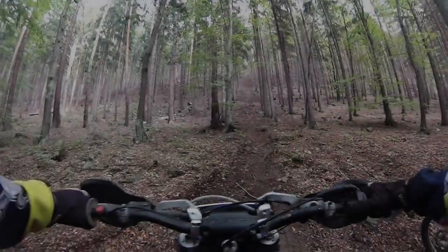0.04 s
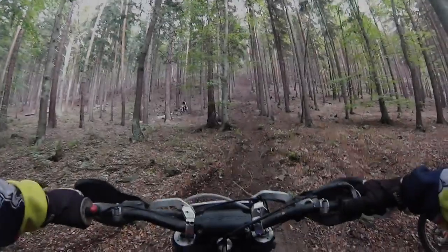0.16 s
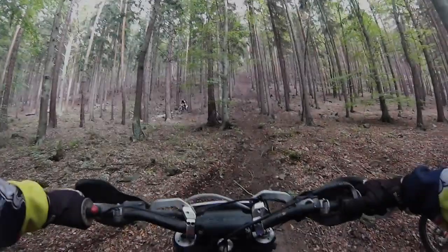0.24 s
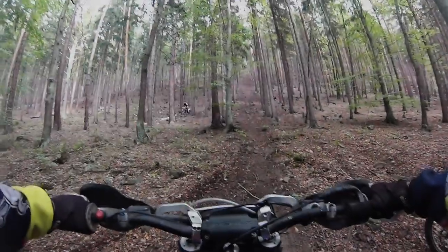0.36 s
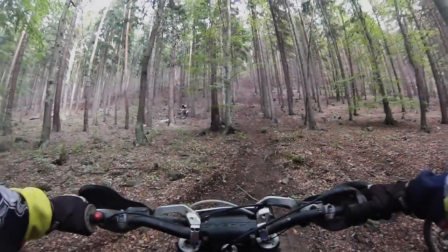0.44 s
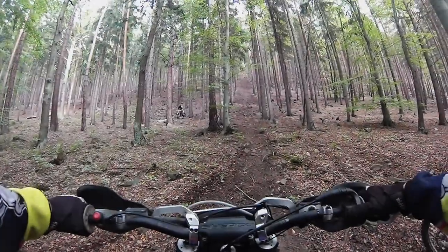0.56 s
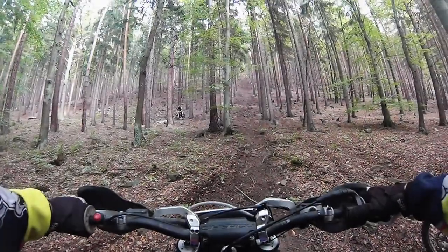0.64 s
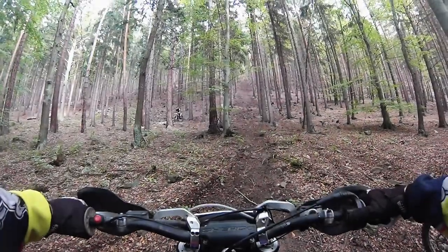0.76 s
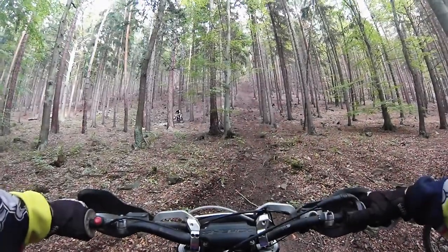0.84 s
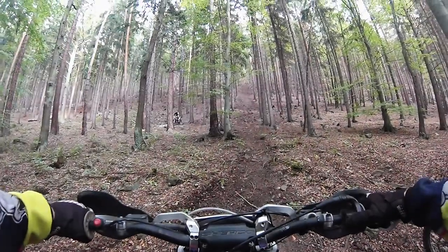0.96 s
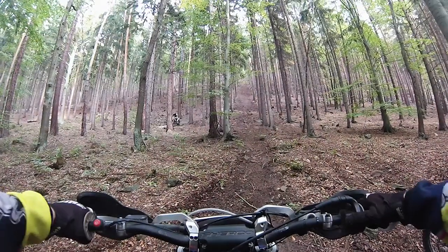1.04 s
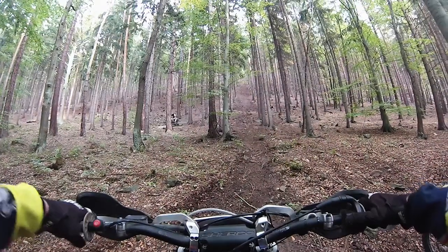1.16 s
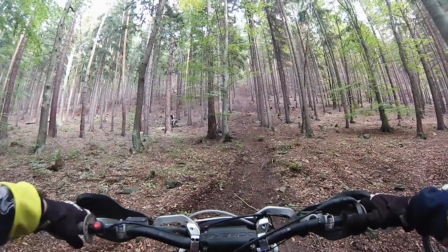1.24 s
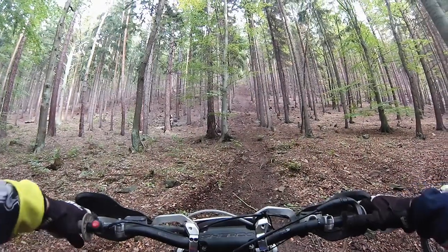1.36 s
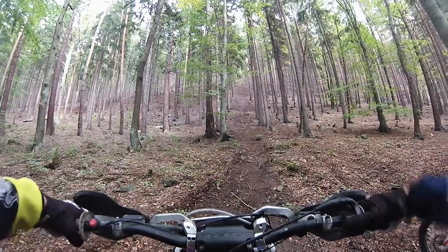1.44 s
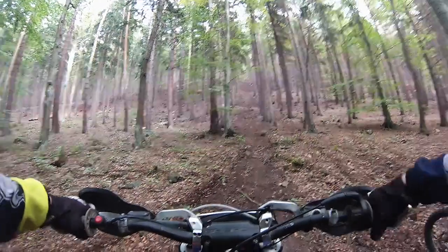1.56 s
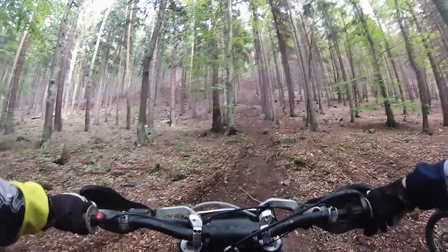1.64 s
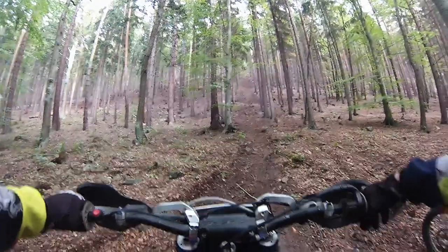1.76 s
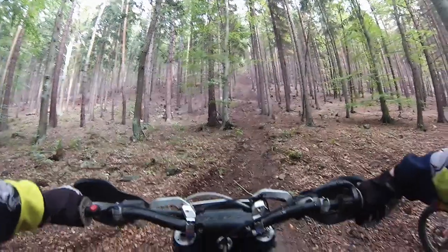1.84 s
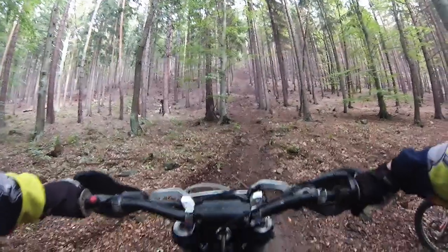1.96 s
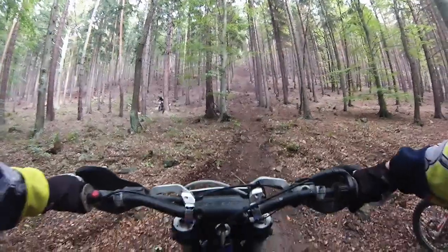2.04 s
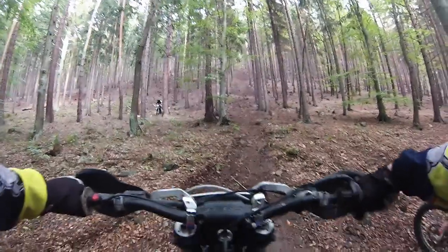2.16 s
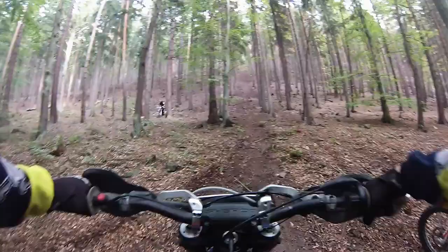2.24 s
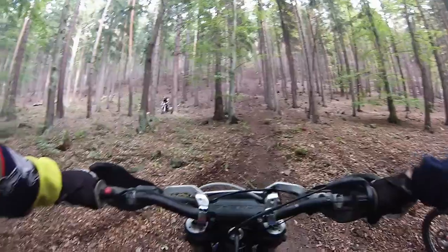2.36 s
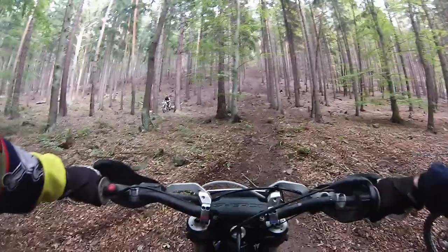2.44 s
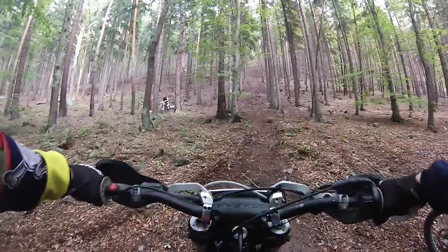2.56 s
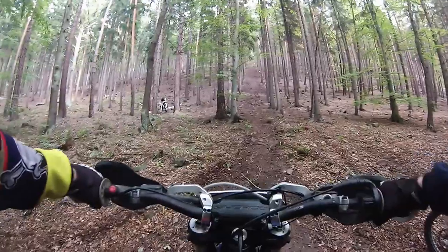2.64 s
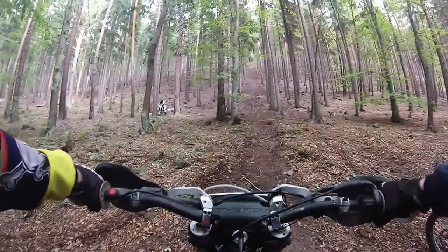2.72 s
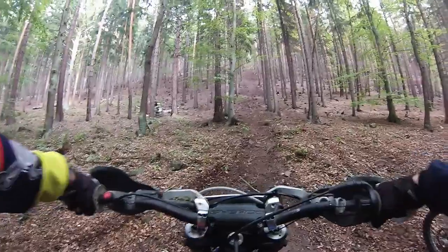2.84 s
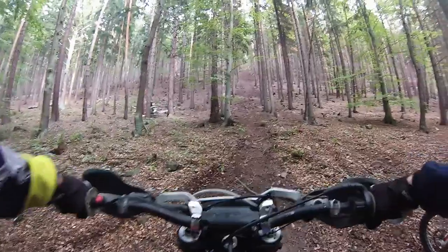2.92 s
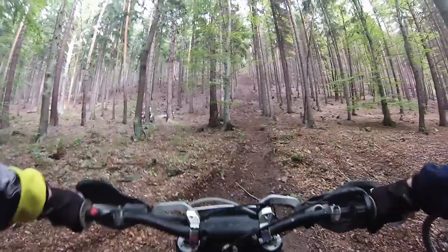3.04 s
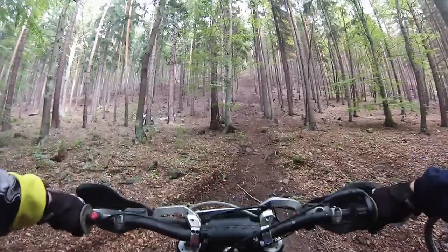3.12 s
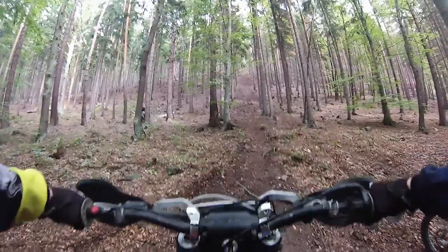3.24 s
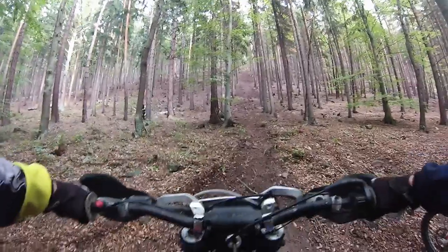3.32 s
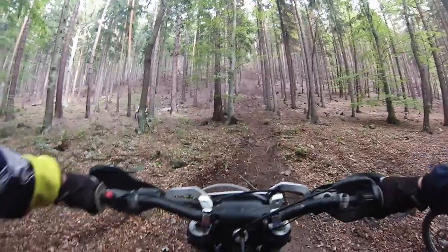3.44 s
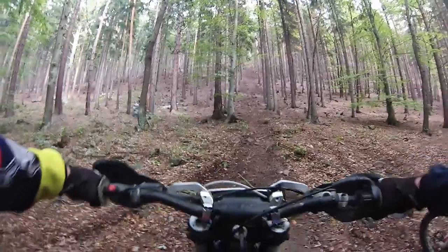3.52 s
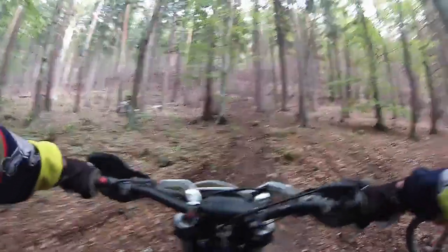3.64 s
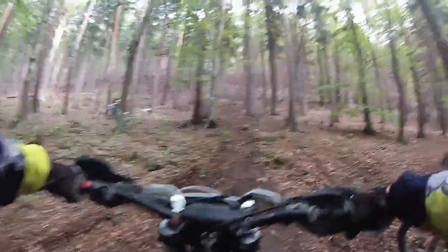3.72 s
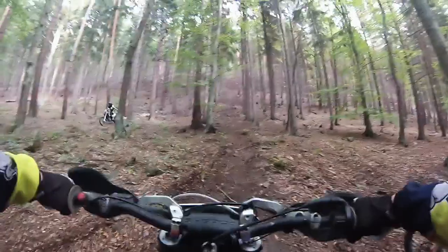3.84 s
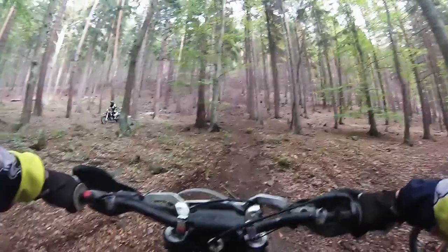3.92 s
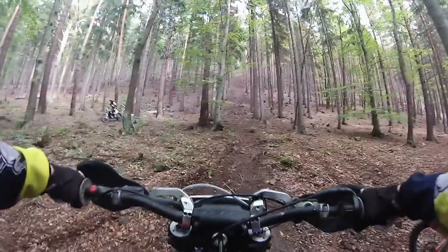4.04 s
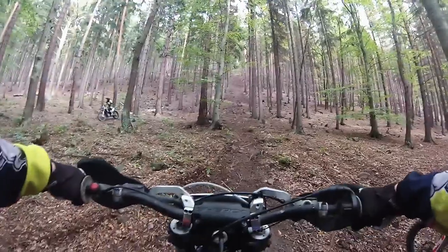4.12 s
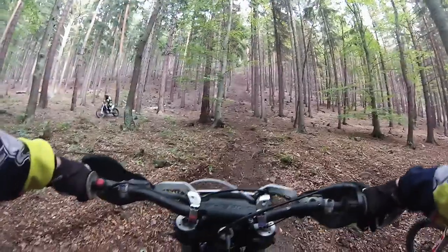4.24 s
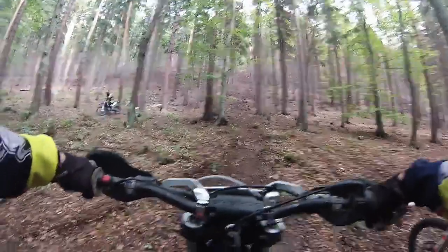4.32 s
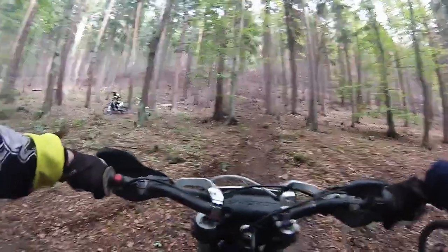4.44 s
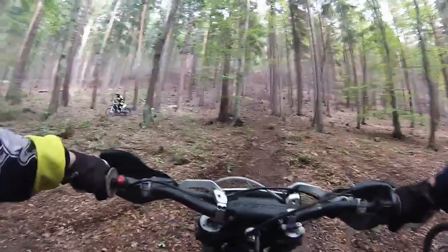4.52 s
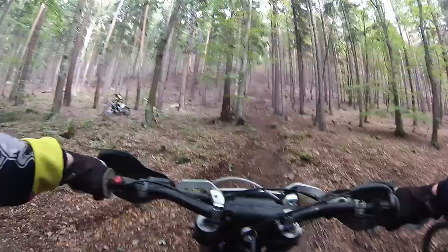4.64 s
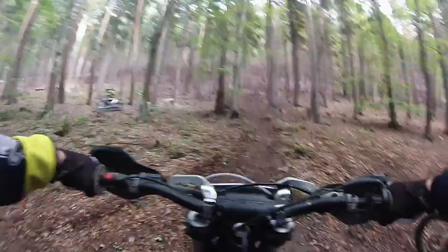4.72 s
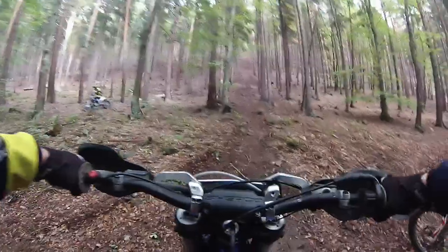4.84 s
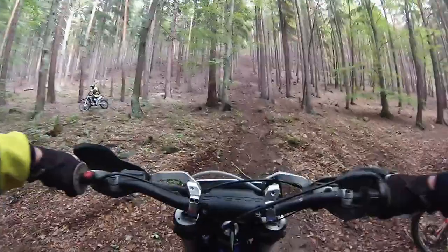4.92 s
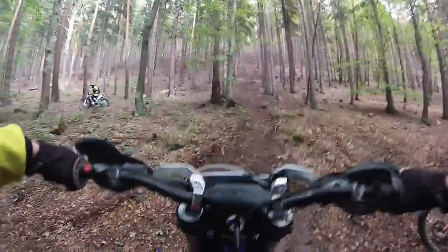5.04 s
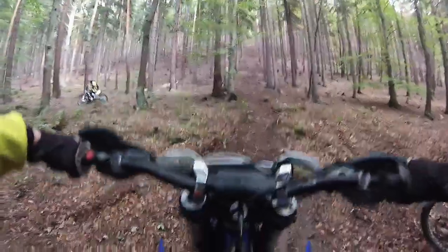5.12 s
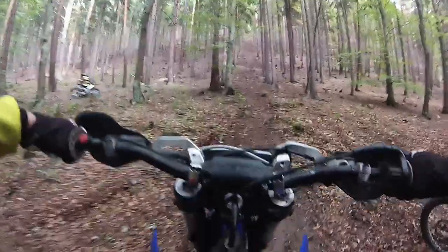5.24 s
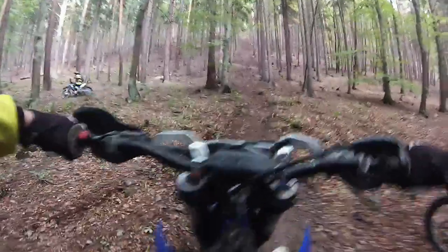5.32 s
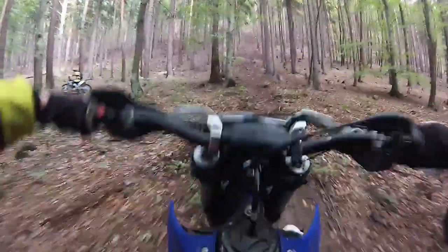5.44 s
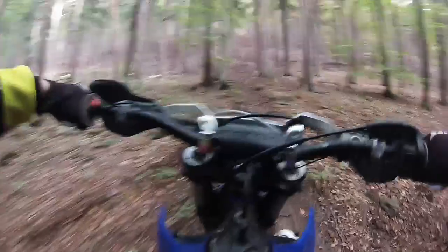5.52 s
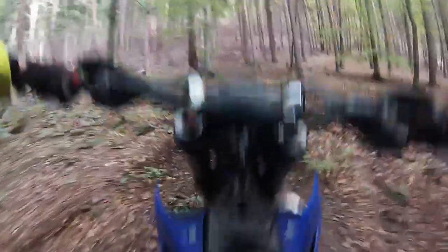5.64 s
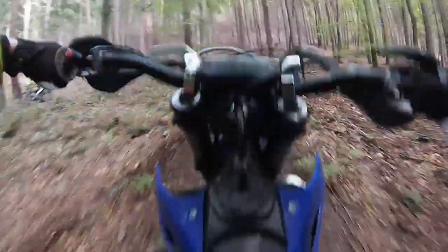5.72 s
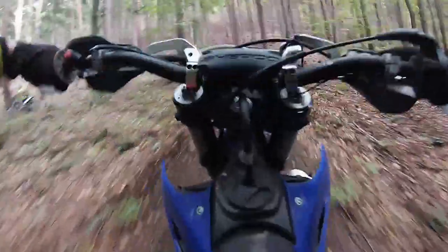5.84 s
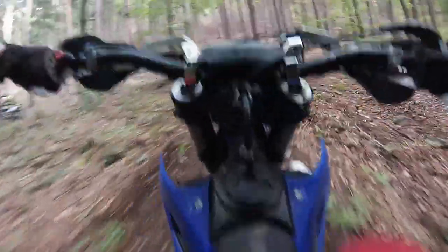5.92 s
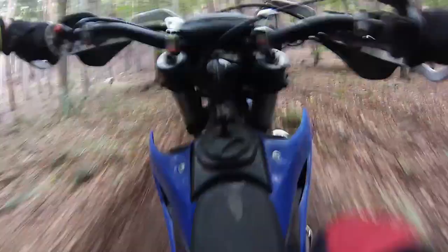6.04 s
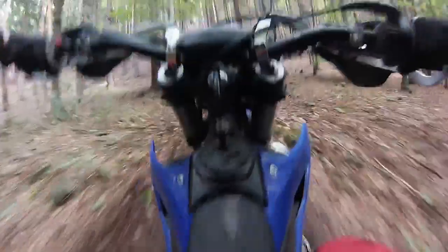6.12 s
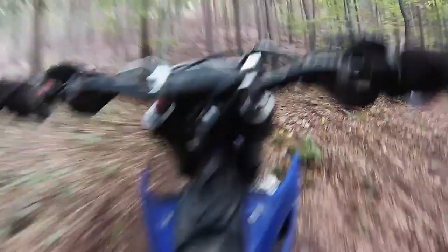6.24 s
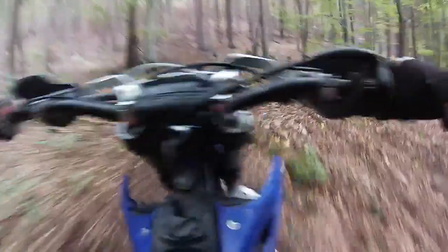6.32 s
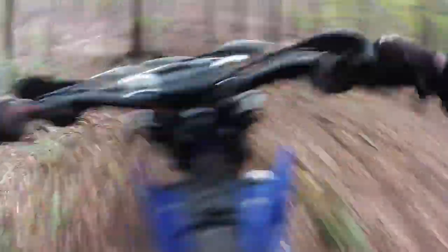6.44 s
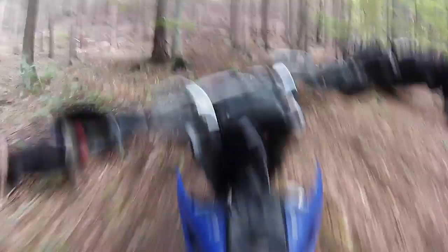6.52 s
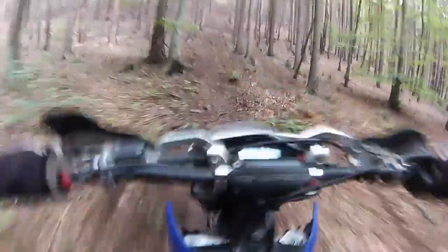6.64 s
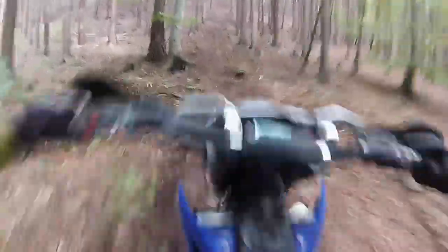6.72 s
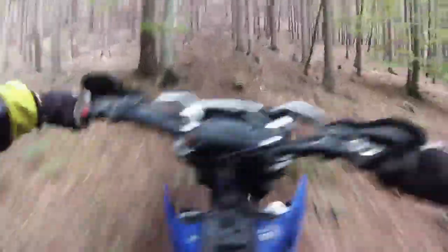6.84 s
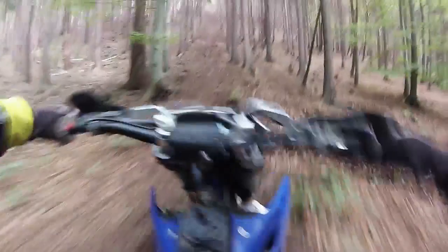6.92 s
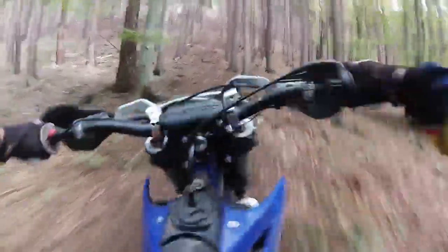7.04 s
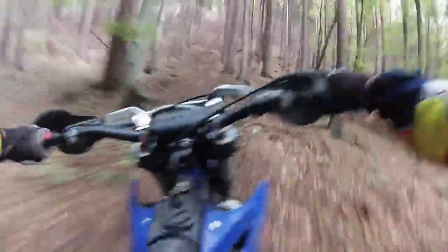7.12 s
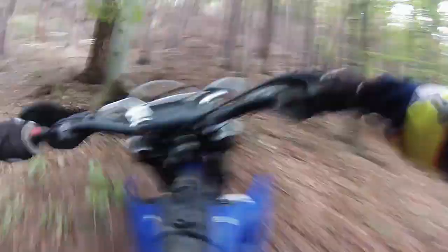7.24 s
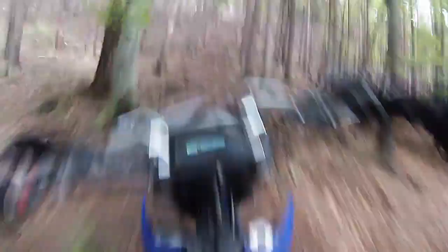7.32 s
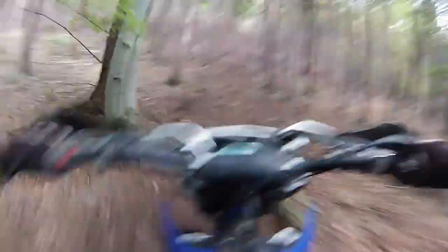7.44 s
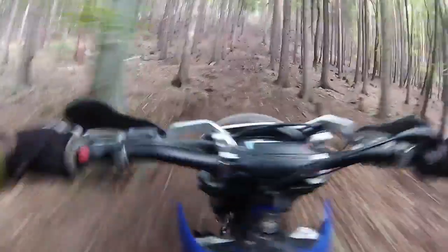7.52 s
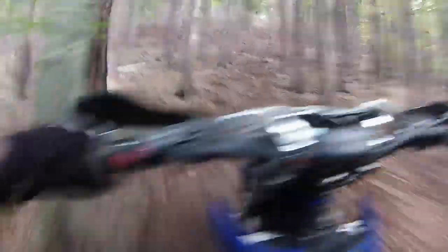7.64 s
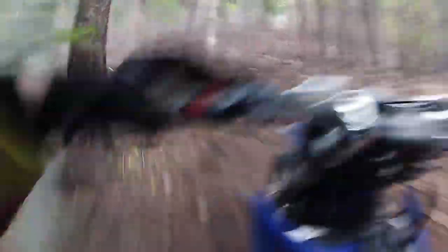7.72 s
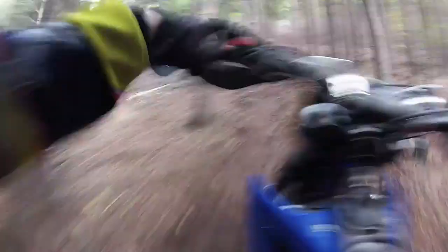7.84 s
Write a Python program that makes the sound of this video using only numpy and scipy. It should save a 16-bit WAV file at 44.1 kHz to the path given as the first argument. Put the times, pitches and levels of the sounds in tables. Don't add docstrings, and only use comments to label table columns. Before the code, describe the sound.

Cloth rustles and levers click, then a two-stroke dirt bike is kicked alive, blipped unevenly with cracks, and climbs at raspy full throttle.

```python
import sys
import numpy as np
from scipy import signal
from scipy.fft import rfft, irfft
from scipy.io import wavfile
from scipy.ndimage import uniform_filter1d

SR = 44100
rng = np.random.default_rng(int(sys.argv[2]) if len(sys.argv) > 2 else 0)


def wav_record(signal):
    frames = np.transpose(np.atleast_2d(signal))
    bounded = np.clip(frames, -1, 1)
    quanta = np.round(bounded * 32767).astype(np.int16)
    wavfile.write(sys.argv[1], SR, quanta)


N = 347067


def engine():
    speed, turns = crank()
    boom_db, bark_db, rasp_db, rattle_db, upper_db, rough = controls(speed)
    luck = rng.standard_normal((800, 4))
    size, pitch, blow, knock = luck[np.floor(turns + .85).astype(int)].T
    top, inlet, late = (np.diff(np.floor(turns - lag), prepend=0) for lag in (0, .15, .65))
    throttle = np.clip((bark_db + 31) / 7, 0, 1)
    slow = np.clip((82 - speed) / 20, 0, 1)
    air = rng.standard_normal(N) * np.sqrt(speed / SR)

    gulp = inlet * gain_of(9 * rough * size) + .9 * rough * air
    bark = air_box(speed, turns, throttle, slow, rough, gulp, late, air, pitch, upper_db)
    rasp = exhaust(throttle, slow, rough, top, late, air, blow)
    out = gain_of(boom_db - 2.5) * boom(speed, turns, throttle, rough, blow)
    out += gain_of(bark_db) * evened(bark, size=4000)
    out += gain_of(rasp_db) * evened(rasp, size=4000)
    out = signal.sosfilt(signal.butter(4, [56, 900], "band", fs=SR, output="sos"), out)

    rattle = case_rattle(speed, throttle, slow, top, late, air, knock)
    rumble = noise([(15, 4), (30, -2), (60, 1), (120, 4), (200, -57)])
    rumble *= gain_of(-53 + 5.7 * (0.5 - slow))
    return (out + gain_of(rattle_db) * rattle + rumble) * between(1.25, 9)


# pitch in Hz, its rise in Hz per turn per second, ring width in Hz, onset width in Hz.
AIR_BOX_MODES = [
    (190, 0, 90, 200),
    (195, 1.05, 45, 170),
    (350, .6, 85, 300),
]


def air_box(speed, turns, throttle, slow, rough, gulp, late, air, pitch, upper_db):
    breath = gulp + .6 * slow * np.roll(gulp, -round(.0074 * SR))
    modes = []
    for hz, rise_hz, width, onset_width in AIR_BOX_MODES:
        wandering_hz = (hz + rise_hz * speed) * (1 + .12 * rough * pitch)
        ring = resonate(breath, wandering_hz, width)
        modes.append(evened(resonate(ring, wandering_hz, onset_width)))
    snorkel, lower, upper = modes
    lid = evened(resonate(resonate(breath, 470, 90), 470, 300)) * between(6.25, 7.15, fade=.1)
    shut = resonate(resonate(gulp + .3 * late + .3 * air, 240, 300), 300, 500)
    chug = gain_of(4 * np.clip((61 - speed) / 7, 0, 1) * np.cos(2 * np.pi * (turns - .2)))
    opened = 0.3 * lid + lower - gain_of(upper_db) * upper - (0.12 + 0.32 * slow) * snorkel
    return throttle * evened(chug * opened, size=4000) + (1 - throttle) * evened(shut, size=4000)


# pitch in Hz, width in Hz, level in dB.
PIPE_MODES = [(496, 250, 1.5), (600, 94, 6), (709, 130, 8.5), (843, 22, 0)]


def exhaust(throttle, slow, rough, top, late, air, blow):
    puff = top * gain_of((1 + 6 * rough) * blow) + (.7 - .4 * throttle) * late
    puff += (.65 - .28 * throttle + 2.8 * rough) * air
    rasp = 0
    for k, (hz, width, db) in enumerate(PIPE_MODES):
        rasp = rasp + (-1) ** k * gain_of(db) * resonate(resonate(puff, hz, width), hz, 160)
    whistle = sum(.25 * evened(resonate(resonate(top, hz, 45), hz, 90)) for hz in (705, 835))
    return evened(rasp, size=4000) + throttle * (1 - slow / 2) * whistle


def boom(speed, turns, throttle, rough, blow):
    second_db = 3 - 4 * throttle + np.clip(70 - speed, 0, 30) / 5
    out = np.cos(2 * np.pi * turns) + gain_of(second_db) * np.cos(4 * np.pi * turns + 0.24)
    free = np.clip((speed - 57) / 8, 0, 1) * between(1.52, 4.5, fade=.05)
    out += 1.5 * free * np.cos(6 * np.pi * turns + 1.1)
    return out * gain_of(-.5 * second_db + 15.0 * rough * uniform_filter1d(blow, 400))


# pitch in Hz, width in Hz, level in dB.
SILENCER_MODES = [(1180, 120, -2), (1300, 40, -3), (1473, 64, 0), (1582, 50, -1.5), (2000, 217, 2.5),
                  (2727, 125, 1.5), (2930, 67, -8), (3228, 63, -4)]


def case_rattle(speed, throttle, slow, top, late, air, knock):
    beat = .5 + 1.2 * throttle + dying(top * gain_of(2.5 * knock), .045) + .25 * dying(late, .04)
    clatter = metal() + gain_of(-27 + 10 * throttle) * noise(HOUSING, lo_hz=6500, hi_hz=13800)
    slap = resonate(resonate(top * gain_of(1.1 * knock), 1847, 130), 1880, 500)
    slap = evened(slap, size=4000) * between(1.32, 9) * np.clip((70 - speed) / 25, 0, 1)

    t = np.arange(900) / SR
    onset = np.sin(np.minimum(t / .0022, 1) * np.pi / 2) ** 2
    blast = 0
    for hz, width, db in SILENCER_MODES:
        blast = blast + gain_of(db - 24 * width * t) * np.sin(2 * np.pi * hz * t) * onset
    loaded = signal.oaconvolve(top * gain_of(2.5 * knock), blast)[:N]
    loaded = loaded * np.clip((speed - 60) / 25, 0, 1) * throttle
    shell = sum(.27 * evened(resonate(air, hz * (.8 + speed / 500), 30)) for hz in (1465, 2930))
    out = evened(beat * clatter, size=4000) + 0.62 * slap + .42 * evened(loaded)
    return out + (1 - slow) * throttle * shell


def crank():
    speed = revs()
    turns = np.cumsum(speed) / SR
    at = np.round(np.transpose(LONE_FIRINGS)[0] * SR).astype(int)
    whole = np.cumsum(np.round(np.diff(turns[at], prepend=0)))
    apart = np.diff(whole, prepend=0) > 0
    nudge = np.interp(np.arange(N), at[apart], (whole - turns[at])[apart])
    return speed, np.maximum.accumulate(turns + nudge + 1)


# start in seconds, turns per
# second there, top in seconds, turns per second at the top, eagerness from 0 to 1.
ENGINE_PULLS = [(1.24, 27.3, 1.31, 29.4, 0), (1.33, 31, 1.545, 73.5, 0), (2.16, 53.5, 2.23, 54.3, 1),
                (2.46, 46.1, 2.68, 55.8, .2), (2.75, 55.2, 2.89, 59.2, .3), (3.2, 47.6, 3.31, 51.7, .3),
                (3.42, 52.5, 3.67, 70, 1), (4.62, 43.6, 4.82, 53.3, .2), (4.975, 56, 5.27, 84.5, 1),
                (5.485, 66, 5.635, 106.5, .15), (5.76, 89, 5.895, 101.3, .3), (6.12, 74, 6.26, 96, .2),
                (6.44, 61.5, 6.5, 58.2, .5), (6.52, 56.5, 6.675, 87, 1), (6.845, 68, 7.17, 100.9, 1),
                (7.32, 96.2, 7.41, 101.8, .2), (7.5, 99.1, 7.61, 103.6, .2), (7.74, 101.1, 7.8, 105, .2)]


def revs():
    u = np.linspace(0, 1, 12)
    times, speeds = [], []
    for t0, low, t1, high, eager in ENGINE_PULLS:
        times.append(t0 + (t1 - t0) * u)
        speeds.append(low + (high - low) * (u + eager * (np.sin(np.pi / 2 * u) - u)))
    speed = np.interp(np.arange(N) / SR, np.hstack(times), np.hstack(speeds))
    flywheel_s = .02
    return uniform_filter1d(speed, round(flywheel_s * SR))


# open in seconds, top in seconds, air box bark in dB when opened,
# bark in dB at the top, seconds to fall 12 dB.
GRIP_TWISTS = [
    (1.255, 1.3, -29, -28, .03),
    (1.33, 1.495, -26, -14.5, .025),
    (1.997, 2.02, -30.5, -29.5, 0.3),
    (2.523, 2.555, -27, -22, 0.17),
    (2.756, 2.836, -27.5, -24.5, 0.2),
    (3.275, 3.54, -29.5, -18.5, .1),
    (3.56, 3.69, -20, -25, .08),
    (3.95, 4.01, -35, -28.5, 0.25),
    (4.711, 4.795, -26, -23.5, 0.2),
]
# time in seconds, air box bark in dB, strain in dB.
CLIMB_LOAD = [(4.93, -36, 2), (4.97, -23.5, 2), (5.12, -15, 2.5), (5.25, -24, 2.5), (5.37, -15, 3.5),
              (5.47, -11.5, 1), (5.67, -16.5, 1), (5.75, -14, 2), (5.89, -15.5, 0.5), (6.0, -16.5, 0),
              (6.09, -12.5, 0.5), (6.19, -18.5, -1), (6.26, -15, 1.5), (6.38, -12, 2), (6.52, -16.5, 3),
              (6.6, -13.5, -0.5), (7.13, -13.5, -2.5), (7.87, -17, 0.5)]
# turns per second, coasting boom in dB, pulling boom in dB,
# pipe rasp in dB, rattle in dB.
LEVELS_BY_SPEED = [(27.8, -40, -36, -50, -47), (44.6, -49, -42, -42, -47.5), (55.9, -37.5, -44, -38, -46),
                   (69.2, -34, -31, -33.5, -37.5), (77, -32, -29, -30, -37), (90, -30, -23, -28, -34),
                   (108, -28, -16.5, -24, -31)]


def controls(speed):
    t = np.arange(N) / SR
    at, *laws = np.transpose(LEVELS_BY_SPEED)
    coast_boom_db, pull_boom_db, rasp_db, rattle_db = (np.interp(speed, at, law) for law in laws)
    climb_start, full_climb = CLIMB_LOAD[0][0], CLIMB_LOAD[1][0]
    climb_db, strain = columns(CLIMB_LOAD)
    climbing = between(climb_start, 9, fade=.05)
    strain = strain * climbing

    coast_db = -30.5 - .55 * np.clip(68 - speed, 0, None)
    twist_s = 0.057
    blips = []
    for t0, t1, db0, db1, fall in GRIP_TWISTS:
        points_s = [t0 - 3 * twist_s, t0, t1, t1 + 4 * fall]
        blips.append(np.interp(t, points_s, [db0 - 45, db0, db1, db1 - 48]))
    before_db = np.maximum(coast_db, np.max(blips, axis=0)) - 60 * between(full_climb, 9)
    bark_db = np.maximum(before_db, climb_db - 60 * (1 - climbing))
    opened = np.clip((bark_db + 31) / 7, 0, 1)

    slowing = uniform_filter1d(np.gradient(speed) * SR, size=3000)
    bog_db = .02 * np.clip(slowing, -200, 0)
    boom_db = coast_boom_db + (pull_boom_db - coast_boom_db + bog_db) * opened + 1.6 * strain
    rasp_db = rasp_db + 1.5 * opened + 1.3 * strain
    fresh_db = 9.5 * np.exp(-((t - 1.395) / 0.11) ** 2)
    rattle_db = rattle_db + 1.5 * opened + strain + fresh_db
    shut_db, blip_db, uphill_db = -4, -11, -9
    upper_open_db = blip_db + climbing * (uphill_db - blip_db + 2 * (t - climb_start))
    upper_db = shut_db + opened * (upper_open_db - shut_db)
    clean_from = 68
    coast_rough = .12 + .0035 * (clean_from - speed)
    pull_rough = .08 + .27 * np.clip((clean_from - speed) / 14, 0, 1)
    rough = coast_rough + opened * (pull_rough - coast_rough)
    return boom_db, bark_db, rasp_db, rattle_db, upper_db, rough


# time in seconds, crack in dB, thud in dB, seconds to fall 60 dB.
LONE_FIRINGS = [(1.253, -48, -6, 0.1), (1.3329, -31, -13, 0.14), (1.472, -19.5, -19, 0.091),
                (1.6494, -29, -11, 0.2), (2.0188, -12, -5.5, 0.13), (2.2124, -19.5, -7.5, 0.17),
                (2.5462, -22, -23, 0.22), (2.588, -25, -1, 0.38), (2.6396, -25.5, -37, 0.13),
                (2.7315, -30, -7, 0.19), (2.7863, -25, -14, 0.2), (2.8391, -25.5, -6, 0.25),
                (2.9045, -27.5, -23, 0.22), (2.996, -29.5, -28, 0.18), (3.091, -37, -24, 0.11),
                (3.1925, -29, -16, 0.12), (3.2767, -25, -2.5, 0.25), (3.3163, -29, -6, 0.27),
                (3.3597, -24.5, -7, 0.13), (3.4002, -24, -15, 0.22), (3.4501, -23.5, -6, 0.34),
                (3.5674, -32, -14, 0.3), (3.8296, -21.5, -8, 0.21), (4.3139, -44, -19, 0.14),
                (4.65, -29.5, -16, 0.14), (4.7246, -23.5, -10.5, 0.17), (4.7636, -22.5, -34, 0.16),
                (4.807, -23, -13, 0.35), (4.8787, -29, -10, 0.24), (4.956, -25, -7, 0.26)]
# pitch in Hz, level in dB, seconds to fall 60 dB.
THUD_MODES = [(259.5, 5.5, 0.068), (428, -5, 0.065), (778, -6, 0.05)]


def firings():
    s, crack_db, thud_db, t60 = np.transpose(LONE_FIRINGS)
    treble_db = -48.5 + 0.55 * (crack_db + 24.5)
    crack = bursts(s, crack_db - 13.5, t60) * metal()
    treble = bursts(s, treble_db - 3.5, t60 * 0.97) * noise(HOUSING, lo_hz=6920)
    blows, t = np.zeros(N), np.arange(2000) / SR
    blows[np.round((s + .004) * SR).astype(int)] = gain_of(thud_db - 19.5)
    ring = sum(gain_of(db - 60 * t / fall) * np.sin(2 * np.pi * hz * t) for hz, db, fall in THUD_MODES)
    return crack + treble + signal.oaconvolve(blows, ring)[:N]


# frequency in Hz, level in dB per Hz.
HOUSING = [(530, -52), (900, 1.5), (955, -49), (1020, 0), (1480, -2.5), (2130, -4), (2360, -10),
           (2920, -8.5), (3740, -6.5), (5260, -4), (6060, -13.5), (7760, -32), (9930, -36.5), (12600, -32),
           (15000, -50)]
# pitch in Hz, width in Hz, level in dB.
FIN_MODES = [(1380, 90, -10), (1850, 110, -13), (3100, 160, -8), (4150, 120, -11), (5250, 170, -8)]


def metal():
    rings = sum(gain_of(db) * evened(resonate(rng.standard_normal(N), hz, w)) for hz, w, db in FIN_MODES)
    return evened(noise(HOUSING, hi_hz=6500) + rings)


# frequency in Hz, level in dB per Hz.
CLOTH_SPECTRUM = [(18, -62), (30, -10), (117, -11), (283, -2), (487, -8), (540, 1), (957, -12.5),
                  (1000, -16), (1300, -46), (2200, -120)]
# time in seconds, level in dB, pitch in Hz, seconds to fall 60 dB.
LEVER_KNOCKS = [(0.065, -43, 705, 0.08), (0.092, -34, 514, 0.08), (0.198, -44, 611, 0.057),
                (0.261, -36, 778, 0.2), (0.4, -57, 396, 0.08), (0.53, -35.5, 1210, 0.064),
                (0.66, -32.5, 700, 0.097), (0.774, -26.5, 3160, 0.058), (0.897, -40, 1280, 0.064),
                (1.028, -47, 1620, 0.15), (1.132, -45, 545, 0.08)]


def rider():
    low, high, bump = moves()
    grain_hits = gain_of(4.9 * rng.exponential(1, N)) * (rng.random(N) < 150 / SR)
    grains = evened(1.2 + dying(grain_hits, 0.09))
    rustle = low * noise(CLOTH_SPECTRUM, lo_hz=178) + high * metal()
    out = (grains * rustle + bump * noise(CLOTH_SPECTRUM, hi_hz=177.7)) * between(-1, 1.26)
    early = 2 * SR
    wide = noise(HOUSING, hi_hz=6500)[:early]
    for s, db, hz, t60 in LEVER_KNOCKS:
        ring = evened(resonate(resonate(rng.standard_normal(early), hz, 427), hz, 1000))
        out[:early] += bursts([s], [db - 18.5], [t60])[:early] * (0.5 * wide + ring)
    return out


# time in seconds, low rustle in dB,
# high rustle in dB, bump in dB, seconds to fall 30 dB.
RIDER_MOVES = [(0.0, -85, -58.5, -71, 0.2), (0.098, -52, -58, -72, 0), (0.288, -54, -49, -89, 0.11),
               (0.411, -55, -80, -63, 0.13), (0.548, -58, -67.5, -87, 0.16), (0.487, -70, -66, -85, .05),
               (0.6, -75, -60, -85, .06), (0.668, -68, -61, -75, 0.06), (0.792, -61, -74, -88, 0.3),
               (0.862, -73, -71, -59, .3), (1.03, -80, -66, -85, 0.5), (1.135, -33.5, -44, -64, 0.4),
               (1.17, -46, -45, -70, .5), (1.258, -40, -48, -46, .1)]


def moves():
    t = np.arange(N) / SR
    gains = 0
    for s, *db, fall in RIDER_MOVES:
        reach_s = .045 if s < 1.1 else .012
        away = np.where(t < s, (s - t) / reach_s, (t - s) / max(fall, .01))
        gains = gains + gain_of(np.array(db)[:, None] - 30 * away)
    return gains


# frequency in Hz, level in dB per Hz.
HISS_SPECTRUM = [(15, -32), (25, 8), (172, -7), (691, -0.5), (952, -20), (1580, -8), (2370, -23),
                 (2930, -8), (5280, -23.5), (6200, -20), (15000, -44)]


def forest():
    return gain_of(-69.5) * noise(HISS_SPECTRUM, hi_hz=13500)


def gain_of(db):
    return 10 ** (np.asarray(db) / 20)


def evened(x, size=None):
    if size is None:
        power = np.mean(x ** 2)
    else:
        power = uniform_filter1d(uniform_filter1d(x ** 2, size), size)
    return x / np.sqrt(abs(power) + 1e-12)


def columns(rows):
    s, *values = np.transpose(rows)
    return [np.interp(np.arange(N) / SR, s, v) for v in values]


def between(t0, t1, fade=0.0044):
    t = np.arange(N) / SR
    return np.clip((t - t0) / fade, 0, 1) * np.clip((t1 - t) / fade, 0, 1)


def noise(points, lo_hz=0, hi_hz=SR):
    hz, (f, db) = np.fft.rfftfreq(N, 1 / SR), np.transpose(points)
    shape = gain_of(np.interp(np.log(hz + 1), np.log(f + 1), db)) * (hz >= lo_hz) * (hz < hi_hz)
    return evened(irfft(rfft(rng.standard_normal(N)) * shape, N))


def resonate(x, hz, width):
    turn = np.exp(2j * np.pi * np.cumsum(hz * np.ones(len(x))) / SR)
    r = np.exp(-np.pi * width / SR)
    return 2 * (turn * signal.lfilter([1 - r], [1, -r], x / turn)).real


def dying(starts, t60):
    return signal.lfilter([1], [1, -gain_of(-60 / (t60 * SR))], starts)


def bursts(s, db, t60):
    out, t = np.zeros(N + SR), np.arange(SR // 2) / SR
    for at, level, ring in zip(s, db, t60):
        rise = np.minimum(t / .0007, 1)
        out[round(at * SR):][:len(t)] += gain_of(level - 60 * t / max(ring, .01)) * rise
    return out[:N]


def scene():
    return (engine() + firings() + rider() + forest())[None]


def band_limit(x):
    return signal.sosfilt(signal.butter(12, 15240, fs=SR, output="sos"), x)


def record(dry):
    mix = 1.167 * np.tanh(dry / 1.172)
    return band_limit(mix)


dry = scene()
out = record(dry)
wav_record(out)
```